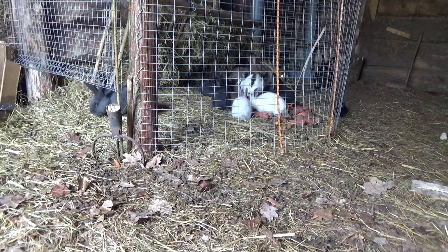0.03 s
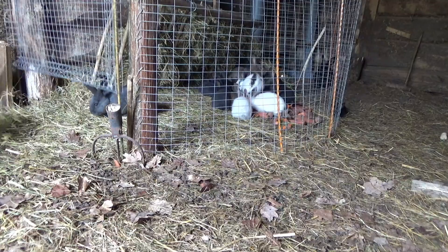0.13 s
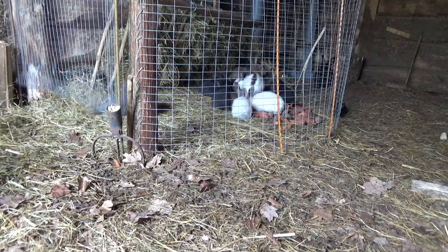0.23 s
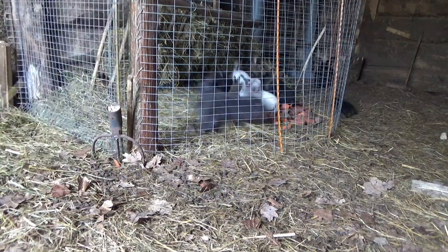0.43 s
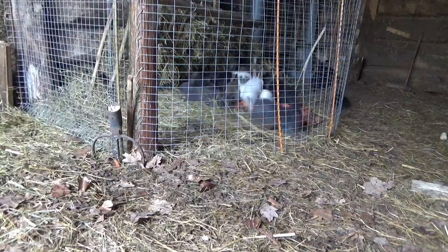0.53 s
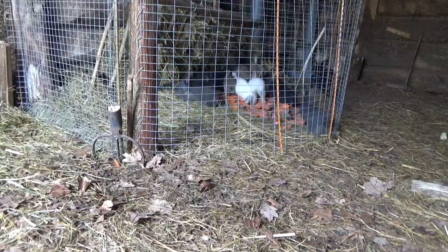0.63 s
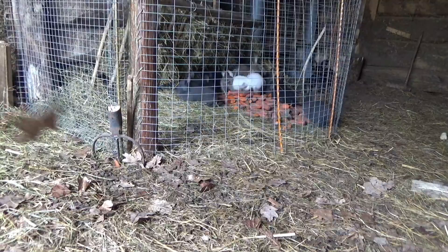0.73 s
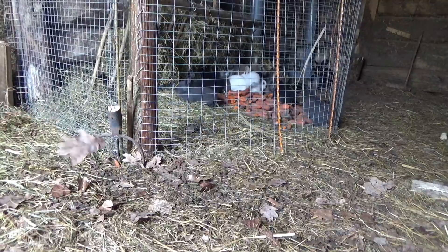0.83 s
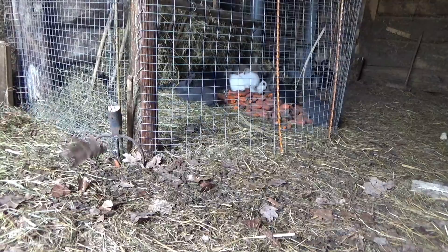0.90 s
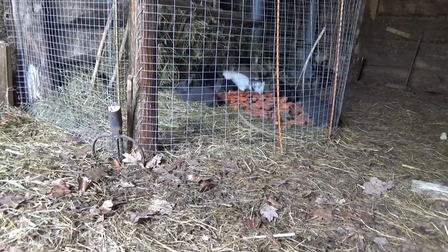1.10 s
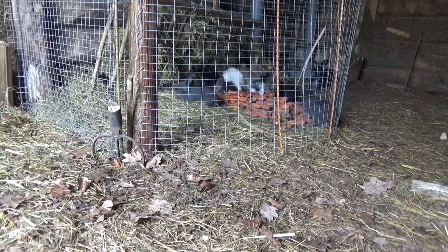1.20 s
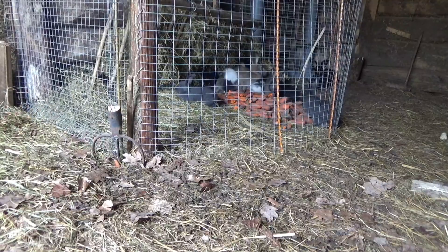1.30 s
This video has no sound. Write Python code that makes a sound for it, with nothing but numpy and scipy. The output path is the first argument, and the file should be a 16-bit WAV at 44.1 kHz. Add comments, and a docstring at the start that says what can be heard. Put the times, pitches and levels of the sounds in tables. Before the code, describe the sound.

A wire-mesh cage drops with a loud metallic rattle, then jingles as a wooden prop clatters

```python
"""A cord yanks the prop from under a wire-mesh cage in a farm shed, amid the faint air of the yard.
The cage scrapes and rattles down onto straw: random impacts excite short wire modes, jolts ring
its panels, the sliding wire whines and single wires snap. The mesh then shivers in bursts of fine
jingling, dying away, while the wooden prop clatters on the left as damped, gliding tones and
crunches the litter. Soft thuds and a grainy rustle come from the straw; the shed adds a short echo."""
import sys
import numpy as np
from scipy import signal
from scipy.fft import rfft, irfft, next_fast_len
from scipy.io import wavfile

SR = 44100
rng = np.random.default_rng(int(sys.argv[2]) if len(sys.argv) > 2 else 0)


def store_wav(level_fs):
    """Save 16-bit WAV to argv[1]."""
    pcm = np.round(np.clip(np.atleast_2d(level_fs), -1, 1) * 32767)
    wavfile.write(sys.argv[1], SR, pcm.T.astype(np.int16))


N = 59535

# spread in strength of the impacts in the rattle, the litter and the straw
GRAIN_SPREAD_DB = 3.5
# level of the left channel over the right for the cage and the straw under it
CAGE_PAN_DB = 2.5


def amp(db):
    """Level and amplitude: 20 dB is a factor of ten in gain."""
    return 10 ** (np.asarray(db) / 20)


def clock():
    """Sampling: the time of each sample in seconds."""
    return np.arange(N) / SR


def unit(x):
    """Normalisation: scale a signal to rms 1."""
    return x / np.sqrt(np.mean(x ** 2))


def curve(rows):
    """Envelope: gain interpolated in dB along (t/s, level/dB) points."""
    return amp(np.interp(clock(), *np.array(rows).T))


def since(start):
    """Causality: the time in seconds since an event, zero before it."""
    return np.maximum(clock() - start, 0)


def fade(start, t60, attack=1e-4):
    """Damping: a quick linear rise, then an exponential decay of 60 dB in t60 seconds."""
    age = since(start)
    return np.minimum(age / attack, 1) * np.exp(-np.log(1000) * age / t60)


def colour(x, points):
    """Minimum-phase filtering: a causal filter whose gain passes through (f/Hz, level/dB) points."""
    hz, db = np.array(points).T
    size = next_fast_len(2 * N)
    f = np.maximum(np.arange(size // 2 + 1) * SR / size, 1)
    log_gain = np.log(amp(np.interp(np.log(f), np.log(hz), db)))
    # folding the cepstrum onto positive times makes the response causal
    cepstrum = irfft(log_gain, size)
    cepstrum[1:size // 2] *= 2
    cepstrum[size // 2 + 1:] = 0
    response = np.exp(rfft(cepstrum))
    return irfft(rfft(x, size) * response, size)[:N]


def band(hz, width):
    """Band-limited noise of rms 1; width is the log of the ratio of the band edges."""
    edges = hz * np.exp(np.array([-width, width]) / 2)
    edges = np.minimum(edges, [SR / 3, SR / 2 - 1])
    sos = signal.butter(2, edges, "band", fs=SR, output="sos")
    return unit(signal.sosfilt(sos, rng.standard_normal(N)))


def wander(rate):
    """Low-passed noise: a smooth random fluctuation of rms 1, with its cutoff at rate in Hz."""
    sos = signal.butter(2, rate, fs=SR, output="sos")
    return unit(signal.sosfilt(sos, rng.standard_normal(N)))


def ring(x, response):
    """Linear response: convolve x with an impulse response scaled to unit energy."""
    return signal.fftconvolve(x, response / np.sqrt(np.sum(response ** 2)))[:N]


def contacts(rate, spread_db):
    """Shot noise: tiny random impacts of uneven strength and either sign, rate per second."""
    struck = rng.random(N) < rate / SR
    strength = amp(spread_db * np.clip(rng.standard_normal(N), -2, 2))
    sign = rng.choice([-1, 1], N)
    return unit(struck * sign * strength)


def wires(rate, spread_db, t60, points, count=6):
    """Dense modal response: impacts click and ring countless short wire modes in patches across the mesh."""
    mesh_spread = 0.33  # rms of side over mid
    mid, side = 0, 0
    for place in np.linspace(-1, 1, count):  # from right to left, as positive side is left
        hits = contacts(rate / count, spread_db)
        modes = rng.standard_normal(N) * fade(0, t60)
        patch = hits / 2 + ring(hits, modes)
        mid = mid + patch
        side = side + place * patch
    mid = unit(colour(mid, points))
    side = mesh_spread * unit(colour(side, points))
    return np.array([mid + side, mid - side])


def pan(x, db):
    """Interchannel level difference: db is left over right, so positive is left."""
    return x * amp(np.array([[db], [-db]]) / 2)


def cage():
    """Superposition: the falling cage rattles, scrapes and snaps, its panels ring and its wire whines."""
    # the mesh catches and slips in clusters
    catch_rate_hz, catch_db, scrape_pan_db = 180, 0.84, 2.5
    catching = unit(amp(catch_db * wander(catch_rate_hz)))
    body = catching * rattle() + panels() + whine()
    wire = catching * scrape() + snaps()
    return pan(body, CAGE_PAN_DB) + pan(wire, scrape_pan_db)


def rattle():
    """Impact excitation: random knocks ring the wires as the cage falls and settles."""
    # force of the rattle: t/s, relative level/dB
    force = [(.118, -64), (.122, -45.5), (.186, -38), (.225, -30.5), (.262, -27.5), (.292, -23), (.32, -24),
             (.37, -20), (.42, -27.5), (.45, -32), (.51, -39.5), (.62, -38.5), (.76, -42), (.92, -50.5),
             (1.1, -51.5), (1.35, -55.5)]
    # spectrum of the rattle: f/Hz, relative density/dB
    spectrum = [(50, -31), (130, -15), (220, -19.5), (320, -5), (620, -1), (950, -1.5), (1300, -2.5),
                (2100, -2), (2500, -10.5), (5000, -16), (15000, -40)]
    rate_per_s, t60_s, gain_db = 1100, 0.049, -3
    return amp(gain_db) * curve(force) * wires(rate_per_s, GRAIN_SPREAD_DB, t60_s, spectrum)


def scrape():
    """Frictional excitation: wire scraping over wire is a dense stream of nearly equal impacts."""
    # force of the scraping: t/s, relative level/dB
    force = [(.118, -79), (.122, -46.5), (.152, -35), (.19, -36.5), (.21, -32), (.22, -26), (.26, -25),
             (.3, -23), (.34, -21), (.378, -20), (.39, -23.5), (.425, -23.5), (.445, -29), (.49, -32.5),
             (.56, -39.5), (.7, -32.5), (.76, -40), (.95, -44), (1.35, -53)]
    # spectrum of the scraping: f/Hz, relative density/dB
    spectrum = [(300, -26), (1500, -12.5), (3000, 1.5), (4200, -3), (5300, -0.5), (6500, 1), (8500, 1.5),
                (10500, -2), (12500, -9), (16000, -17.5)]
    rate_per_s, spread_db, t60_s, gain_db = 3000, 1, 0.021, -2
    return amp(gain_db) * curve(force) * wires(rate_per_s, spread_db, t60_s, spectrum)


def panels():
    """Modal synthesis: jolts ring the bending panels, each ring tuned a little differently and sagging."""
    # jolts of the frame: t/s, relative level/dB
    jolts = [(0.191, -41), (.218, -29), (0.29, -27.5), (.33, -22), (.362, -25.5), (.392, -19.5),
             (.462, -29.5), (.502, -31), (.53, -36)]
    # modes of the mesh panels: nominal f/Hz, relative level/dB, t60/s
    modes = [(335.7, -1.5, 0.3), (356.2, 1.5, 0.305), (393, 5.5, 0.37), (533, -2, 0.21), (575, -2, 0.44),
             (613, -2, 0.29), (766, -12, 0.21), (855, 1, 0.26), (1336, -6.5, 0.63), (1455, -6, 0.15),
             (1500, -4.5, 0.3), (1714, 5, 0.12), (2070, -7, 0.17)]
    gain_db, rise_s = -8.5, 0.0091
    detune_rms, sag_per_s = 0.01146, 0.107  # fractions of the mode frequency
    out = 0
    for start, jolt_db in jolts:
        age = since(start)
        slack_time = age - sag_per_s * age ** 2 / 2  # its slope is the falling pitch
        tuning = 1 + detune_rms * rng.standard_normal(len(modes))
        phases = rng.random(len(modes))  # in cycles
        for (hz, db, t60), tune, phase in zip(modes, tuning, phases):
            tone = np.sin(2 * np.pi * (tune * hz * slack_time + phase))
            out = out + amp(jolt_db + db) * fade(start, t60, rise_s) * tone
    return amp(gain_db) * out


def whine():
    """Frequency modulation: sliding wire sings a thin note that climbs, fluttering in pitch and level."""
    # glide of the whine: t/s, mean f/Hz, relative level/dB
    glide = [(.14, 1399, -56), (.195, 1790, -50), (.222, 2050, -31), (.26, 2050, -43), (.33, 2050, -40),
             (0.376, 2085, -30), (.41, 2130, -34), (0.449, 2290, -45), (.5, 2280, -77)]
    jitter_rms, flutter_db, flutter_rate_hz = 0.029, 6, 153  # jitter is a fraction of the pitch
    times, hz, db = np.array(glide).T
    pitch = np.interp(clock(), times, hz) * (1 + jitter_rms * wander(flutter_rate_hz))
    tone = np.sin(2 * np.pi * np.cumsum(pitch) / SR)
    voice = unit(amp(flutter_db * wander(flutter_rate_hz)) * tone)
    return (clock() > times[0]) * amp(np.interp(clock(), times, db)) * voice


def snaps():
    """Sudden release: single wires catch and let go, each a damped tick of narrow-band noise."""
    # wires snapping past each other: t/s, relative level/dB, centre f/Hz
    releases = [(.242, -15, 3370), (0.269, -12, 7150), (0.275, -11.5, 7450), (0.282, -12.5, 7800),
                (0.297, -12.5, 13200), (.308, -16, 13200), (.315, -13, 6500), (0.325, -9, 7100),
                (0.3313, -5.5, 6960), (0.335, -12, 5270), (0.348, -15.5, 1900), (0.3613, -10, 5250),
                (.371, -20, 3500), (.377, -4.5, 6870), (.404, -10, 8140), (.508, -21, 2000),
                (.573, -19.5, 4720), (.591, -19.5, 10200)]
    t60_s, log_width, gain_db = 0.018, 0.28, -6.5
    ticks = sum(amp(db) * fade(start, t60_s) * band(hz, log_width) for start, db, hz in releases)
    return amp(gain_db) * ticks


def jingle():
    """Power addition: trembling and shivers add in energy to drive the chatter of the loose joints."""
    # steady trembling of the mesh: t/s, level/dB
    tremble = [(.3, -72), (.46, -48.5), (.66, -42.5), (.97, -40.5), (1.13, -46), (1.35, -61.5)]
    # bursts in which the loose mesh shivers: t/s, level/dB
    shivers = [(.501, -37), (.588, -32.5), (.646, -32), (0.768, -33), (.888, -35.5), (1.015, -40.5),
               (1.06, -38), (1.198, -46.5)]
    # spectrum of the jingle: f/Hz, relative density/dB
    spectrum = [(400, -22), (1500, -15.5), (2900, -6), (3800, -13.5), (4750, -1), (5500, -6.5), (6800, -6),
                (8200, 1.5), (9300, -3.5), (10500, -11), (13000, -22.5), (16000, -27)]
    shiver_t60_s, shiver_attack_s = 0.29, 0.0031
    rate_per_s, spread_db, t60_s = 1900, 5, 0.05
    bursts = sum((amp(db) * fade(start, shiver_t60_s, shiver_attack_s)) ** 2 for start, db in shivers)
    shaking = np.sqrt(curve(tremble) ** 2 + bursts)
    return shaking * wires(rate_per_s, spread_db, t60_s, spectrum)


def prop():
    """Impact and granular yielding: the wooden prop knocks and bounces, crunching the litter under it."""
    # wooden knocks: t/s, level/dB, starting f/Hz, t60/s
    knocks = [(0.1218, -37, 950, 0.018), (.291, -15, 1420, 0.012), (.5909, -26, 660, 0.021),
              (0.6516, -13, 983, 0.017), (.658, -14.5, 610, 0.01), (0.6819, -1, 1600, 0.0035),
              (0.682, -14.5, 2870, 0.0021), (.688, -13, 620, 0.0087), (0.6929, -11, 1470, 0.0041),
              (.6967, -9.5, 2950, 0.0067), (.697, -14, 734, 0.015), (0.7032, -17, 880, 0.0083),
              (0.7119, -8, 1210, 0.0037), (0.7166, -22, 480, 0.018), (.7208, -14.5, 1440, 0.0061),
              (.7255, -20, 714, 0.016), (.733, -19.5, 1200, 0.0084), (.838, -28.5, 900, 0.012),
              (.895, -30, 604, 0.036), (.911, -34.5, 830, 0.011)]
    # spectrum of the crunch: f/Hz, relative density/dB
    spectrum = [(60, -16), (190, -4), (280, 5), (400, 3), (700, 4.5), (1500, -3), (2900, -7), (4000, -30),
                (12000, -31)]
    crunch_db, crunch_t60_s, crunch_per_s = -16.5, 0.09, 1500
    limit_db = -15  # the litter gives way above this blow
    wood = sum(amp(db) * knock(start, hz, t60) for start, db, hz, t60 in knocks)
    power = sum((amp(min(db, limit_db)) * fade(start, crunch_t60_s)) ** 2 for start, db, _, _ in knocks)
    grains = unit(colour(contacts(crunch_per_s, GRAIN_SPREAD_DB), spectrum))
    return wood + amp(crunch_db) * np.sqrt(power) * grains


def knock(start, hz, t60):
    """Damped oscillation: pitch glides from the contact note to that of the wood, with a noisy crack."""
    wood_hz, glide_s, attack_s = 530, 0.0038, 0.00052  # glide_s is the time constant of the pitch
    crack_db, crack_hz, crack_t60_s, crack_log_width = -11, 1900, 0.01, 0.92
    age = since(start)
    # integral of a frequency that relaxes from hz to wood_hz
    cycles = wood_hz * age + (hz - wood_hz) * glide_s * (1 - np.exp(-age / glide_s))
    hardness = min(hz / crack_hz, 1) ** 2  # hard, bright contacts crack most
    crack = amp(crack_db) * hardness * fade(start, crack_t60_s) * band(crack_hz, crack_log_width)
    return fade(start, t60, attack_s) * np.sin(2 * np.pi * cycles) + crack


def bedding():
    """Granular noise: straw crushed and shuffled under the cage gives a dull rustle of tiny impacts."""
    # rustle of the straw: t/s, level/dB
    rustle = [(.11, -82), (.22, -48), (.5, -40.5), (.62, -52.5), (.7, -34), (.76, -43), (.8, -47),
              (.87, -48.5), (.905, -45.5), (.95, -49), (1.1, -55.5), (1.35, -61)]
    # spectrum of the straw: f/Hz, relative density/dB
    spectrum = [(30, -37), (100, -13), (180, -7.5), (270, -0.5), (550, 2), (800, -0.5), (1100, -6.5),
                (1600, -13), (5000, -52)]
    rate_per_s = 2500
    return curve(rustle) * unit(colour(contacts(rate_per_s, GRAIN_SPREAD_DB), spectrum))


def thuds():
    """Soft impact: weight coming down on the straw gives slow swells of low-frequency noise."""
    # soft thuds on the bedding: onset t/s, level/dB
    landings = [(.37, -56), (.81, -66)]
    centre_hz, log_width, rise_s = 58, 0.69, 0.022
    swell = 0
    for start, db in landings:
        age = since(start) / rise_s
        swell = swell + amp(db) * age * np.exp(1 - age)  # peaks at one rise time
    return band(centre_hz, log_width) * swell


def echo(direct):
    """Reverberation: the shed answers with delayed, decaying noise, independent in each channel."""
    delay_s, t60_s, level_db = 0.0066, 0.21, -12.5
    walls = rng.standard_normal((2, N)) * fade(delay_s, t60_s)
    return amp(level_db) * np.array([ring(direct.mean(axis=0), wall) for wall in walls])


def yard():
    """Diffuse field: the faint air of the farmyard is independent noise in mid and side."""
    # spectrum of the yard: f/Hz, relative density/dB
    spectrum = [(18, -44), (30, -1), (440, -4), (662, -15), (953, -8), (1170, -9), (15000, -15.5)]
    level_db, side_spread = -68.5, 1
    mid, side = (unit(colour(rng.standard_normal(N), spectrum)) for _ in range(2))
    return amp(level_db) * np.array([mid + side_spread * side, mid - side_spread * side])


def scene():
    """Superposition: cage and prop, too slender to radiate bass, with shed echo, straw and yard."""
    jingle_pan_db, prop_pan_db, low_cut_hz = .2, 7, 260
    direct = cage() + pan(jingle(), jingle_pan_db) + pan(prop(), prop_pan_db)
    highpass = signal.butter(3, low_cut_hz, "high", fs=SR, output="sos")
    direct = signal.sosfilt(highpass, direct)
    return direct + echo(direct) + pan(bedding(), CAGE_PAN_DB) + thuds() + yard()


def record(dry):
    """Mid-side stereo: the image is narrow in the bass and nearly mono in the highest treble; the top is cut."""
    # width of the stereo image: f/Hz, side level/dB
    stereo_width = [(100, -9), (330, -13.5), (700, -0.5), (9500, -2), (11000, -1), (13500, -35)]
    top_hz = 15800
    hz, db = np.array(stereo_width).T
    side_gain = amp(np.interp(np.arange(N // 2 + 1) * SR / N, hz, db))
    mid = (dry[0] + dry[1]) / 2
    side = irfft(rfft(dry[0] - dry[1]) / 2 * side_gain, N)
    lowpass = signal.ellip(10, .1, 80, top_hz, fs=SR, output="sos")
    return signal.sosfilt(lowpass, np.array([mid + side, mid - side]))


dry = scene()
out = record(dry)
store_wav(out)
```